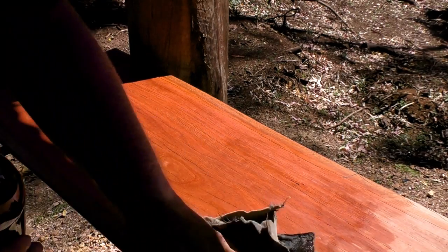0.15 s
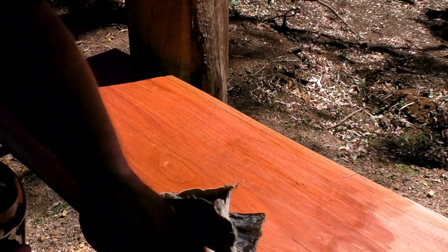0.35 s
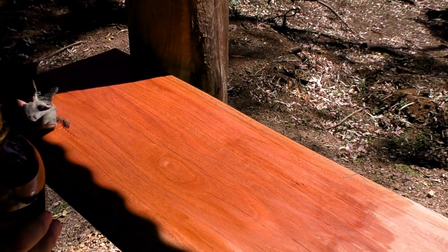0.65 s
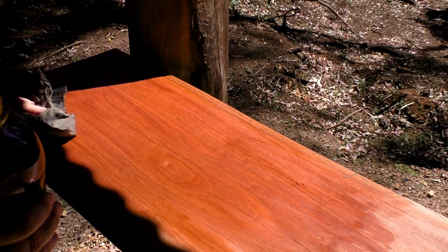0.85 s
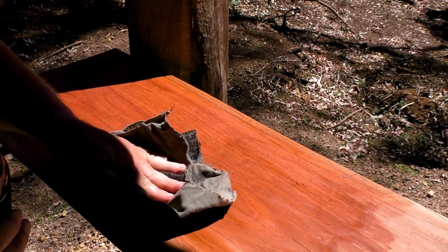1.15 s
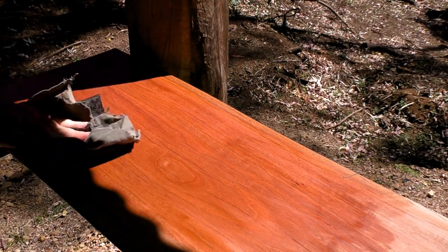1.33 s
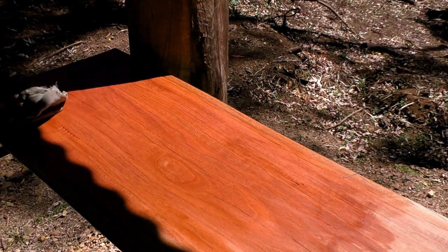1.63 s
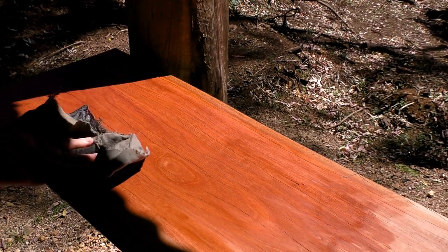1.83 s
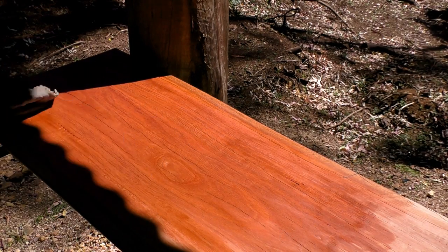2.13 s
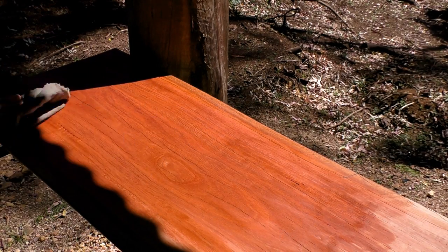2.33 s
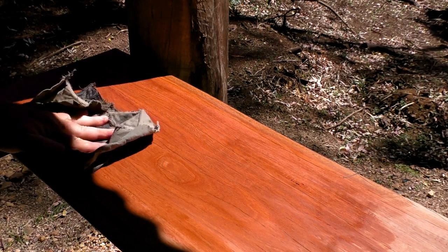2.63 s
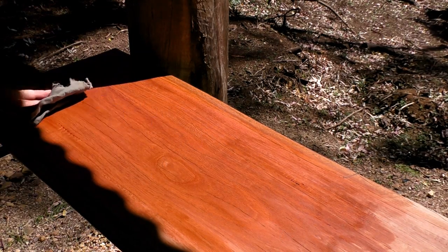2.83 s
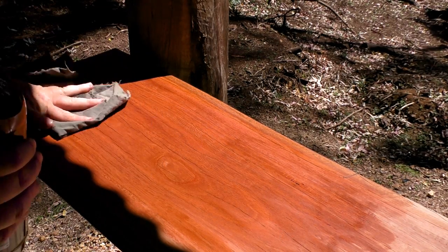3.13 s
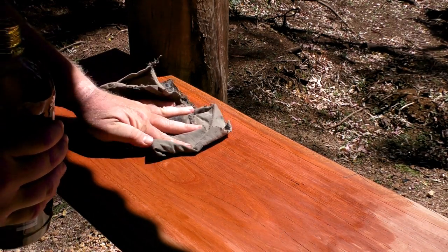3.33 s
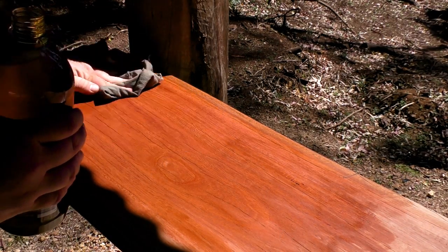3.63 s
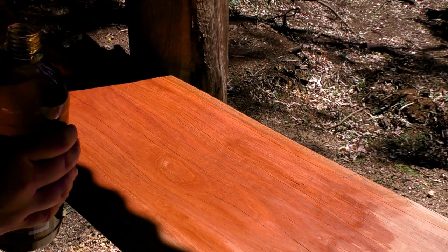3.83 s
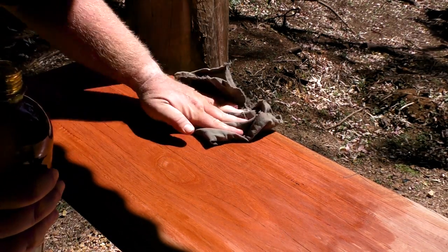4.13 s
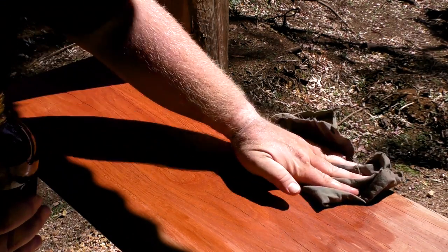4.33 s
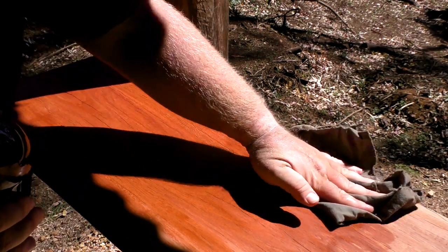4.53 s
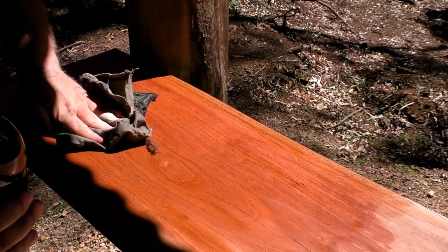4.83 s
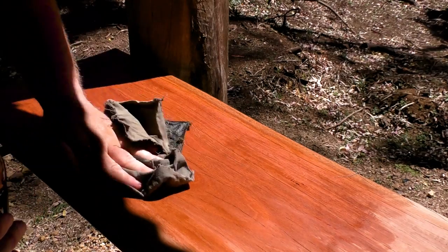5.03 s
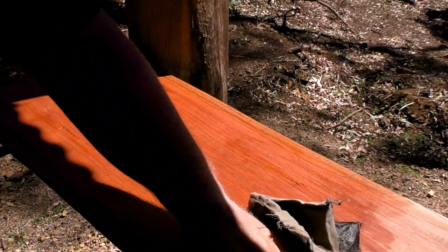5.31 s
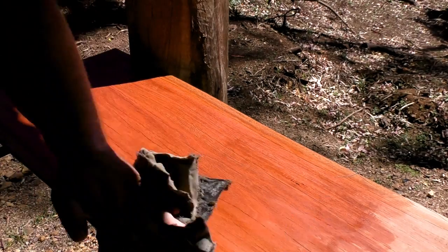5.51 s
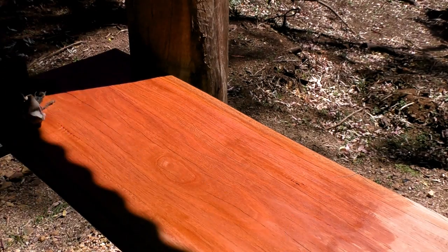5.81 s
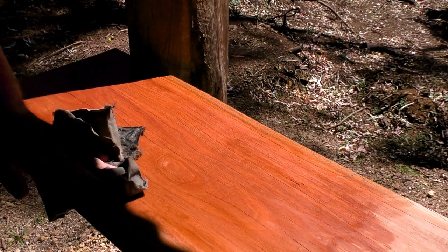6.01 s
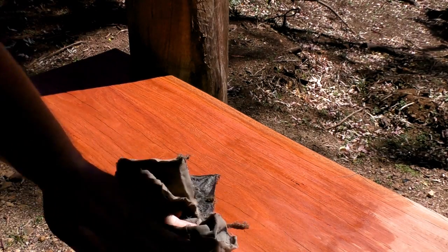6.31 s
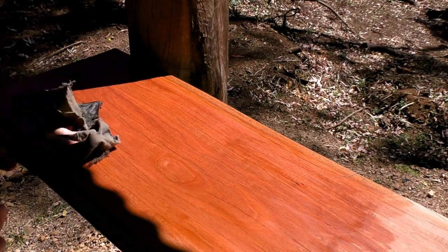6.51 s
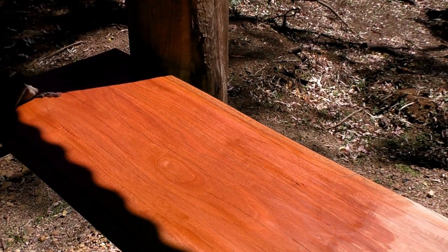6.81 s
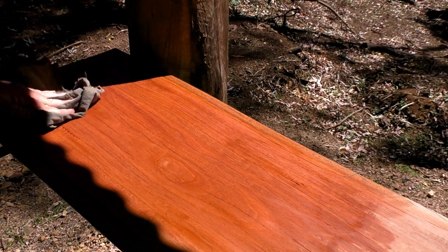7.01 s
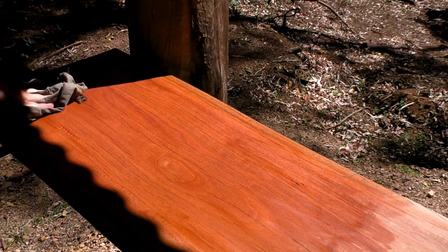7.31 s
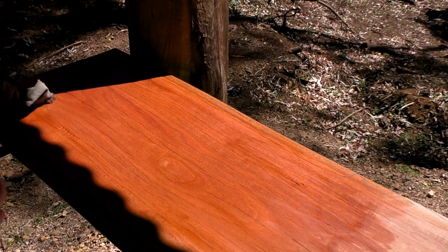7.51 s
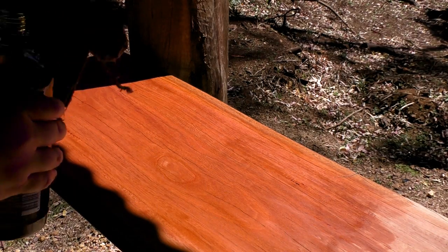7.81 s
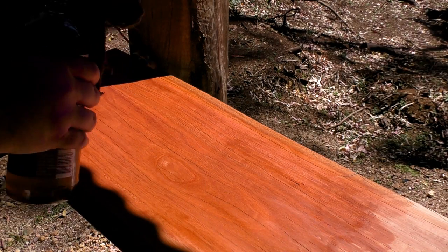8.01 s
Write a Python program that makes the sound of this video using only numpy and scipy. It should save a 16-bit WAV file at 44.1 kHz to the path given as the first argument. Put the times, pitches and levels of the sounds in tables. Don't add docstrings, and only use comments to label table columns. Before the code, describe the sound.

Quick cloth strokes rasp back and forth over bare wood, pausing at each turn, then stop; a bottle ticks at the end.

```python
import sys
import numpy as np
from scipy import signal
from scipy.fft import rfft, irfft
from scipy.io import wavfile
from scipy.ndimage import uniform_filter1d, map_coordinates

SR = 44100
rng = np.random.default_rng(int(sys.argv[2]) if len(sys.argv) > 2 else 0)


def convert_level_to_amplitude(level_db):
    exponent = np.asarray(level_db, float) / 20
    return 10 ** exponent


def pcm_store(signal):
    levels = np.round(np.clip(np.atleast_2d(signal), -1, 1) * 32767)
    wavfile.write(sys.argv[1], SR, levels.astype(np.int16).T)


N = 359856
CLOCK = np.arange(N) / SR

# t/s, level/dB, hollow f/Hz, rise shape, fall shape (small = full, 1 = straight)
STROKES = [(.08, -37, 3380, 0.57, 0.53), (.53, -37, 3500, 1.1, 1.52), (1.14, -40.5, 2660, 0.81, 0.9),
           (1.38, -42, 2700, .7, 1.15), (1.75, -45, 2240, 0.34, 0.69), (2.08, -43.5, 2480, 0.98, 0.81),
           (2.42, -44, 2380, 0.31, 1.3), (2.82, -44, 2350, 1.2, 0.56), (3.27, -39.5, 2380, 0.82, 1.07),
           (3.72, -44, 2300, 0.52, 2.1), (4.26, -42.5, 2380, .6, 0.36), (4.8, -40.5, 2320, 0.44, 0.75),
           (5.22, -41, 2730, 0.84, 0.66), (5.62, -42, 2750, 0.97, 1.1), (6.19, -41.5, 2620, 0.48, 0.54),
           (6.47, -43, 2650, 0.98, 0.69), (7.14, -43.5, 2420, 0.41, .7), (7.36, -43, 2670, 0.88, 0.87),
           (7.598, -41.5, 1830, 1, 0.98)]
# t/s, level/dB around the stop, stop depth/dB, half length/s, reach to near end [0-1]
TURNS = [(0.0, -50.5, -5.3, 0.025, 0.04), (0.32, -47.5, 15.5, 0.017, 0.96), (0.827, -52, 15, 0.013, 0.11),
         (1.24, -51.5, 9, 0.015, 0.42), (1.625, -48.5, 16, 0.019, .05), (1.962, -46, 10.5, .028, 0.42),
         (2.305, -49.5, 15, 0.023, 0), (2.701, -47, 9, .022, 0.23), (3.023, -52, 9.5, 0.041, .05),
         (3.499, -47.5, 8, .022, 0.36), (3.867, -48.5, 15.5, 0.028, 0.19), (4.556, -53, 14, 0.02, 0.76),
         (4.983, -50, 4.5, 0.016, 0), (5.424, -49, 14, 0.016, 0.77), (5.881, -51, 13, 0.015, 0),
         (6.328, -52.5, 11, 0.019, 0.79), (6.907, -55.5, 14, 0.017, 0), (7.24, -52.5, 15, 0.011, 0.33),
         (7.555, -58, -3, 0.023, 0.16), (7.68, -66, 6, .02, 0.2)]
# t/s, far-end left-right level/dB, looseness of hold level/dB
HAND_PATH = [(0, 3, -3), (.2, 4, -5), (.7, 5.5, 0), (1.02, 3, -1), (1.3, 4, -5), (1.52, 4.5, -1),
             (2.15, 4, -1), (2.5, 4, -4.5), (3.22, 3, 1.5), (3.5, 2.5, 1), (4.2, 3, 3), (4.9, 2.8, 0.5),
             (5.3, 4, -2.5), (5.9, 3.5, 4.5), (6.35, 7, -1.5), (6.6, 4.5, -2), (6.8, 3.5, -1.5),
             (7.05, 3.5, 0)]
# t/s, length/s, f/Hz, glide/(Hz per s), lift level/dB
SQUEAKS = [
    (0.087, .04, 3650, 0, 6),
    (.54, .04, 4320, 0, 10),
    (4.73, 0.12, 1550, 7000, 8),
    (7.35, .06, 2700, 1000, 5),
    (5.63, 0.04, 5000, -9000, 3),
    (7.6, .022, 2110, 15000, 7),
]
# middle t/s, half length/s, level/dB
TAILS = [
    (2.1, .3, -56),
    (6.6, .09, -50),
]

# f/Hz, level/dB per Hz
BOARD_DRONE = [(600, -27), (850, -16.5), (1050, -3.5), (1250, -2), (1600, -1), (2200, -18.5), (3000, -65)]
WEAVE_SCRUB = [(900, -16), (1400, -9.5), (2000, -1), (3500, -3), (5000, -4.5), (6500, -13.5), (9000, -67)]
FIBRE_HISS = [(4000, -28), (5500, -1), (7400, -2.5), (9000, 0), (10500, -1), (13000, -13), (15800, -19)]
LOOSE_THREADS = [(8500, -42), (10500, -2), (12000, 3), (13800, -0.5), (15800, -4.5)]
TRAILING_HISS = [(11500, -30), (13200, 1), (15000, .5), (15800, -8)]
# f/Hz, likeness [0-1]
RAG_ALIKE = [(800, 0.72), (1400, 0.87), (3100, 0.94), (5000, 0.9), (6800, 1), (9000, 0.95), (15000, 0.86)]

# t/s, peak level/dB, f/Hz, rise/s
THUMPS = [
    (.30, -45, 62, 0.015),
    (.959, -34.5, 160, 0.0035),
    (2.458, -56, 74.6, 0.021),
    (3.16, -50, 52, 0.022),
    (5.629, -50.5, 75.5, 0.014),
    (7.262, -43, 68.4, 0.015),
    (7.341, -36.5, 65, 0.013),
    (7.355, -35, 120, 0.0078),
    (7.389, -45, 68.4, 0.019),
]
# t/s, level/dB
NUDGES = [
    (1.69, -55.5),
    (2.355, -56),
    (2.55, -72),
    (3.92, -63),
    (5.86, -62),
    (7.01, -58),
    (7.58, -60),
]
# f/Hz, level/dB, t60/s
BOARD_MODES = [(290, -9, 0.11), (399, 6, 0.34), (543, 3, 0.4), (700, -1, 0.28), (1110, -13, 0.063)]
# t/s, peak level/dB
TICKS = [
    (8.075, -44),
    (8.0806, -54),
    (8.13, -54),
]
# f/Hz, level/dB, t60/s
GLASS_MODES = [(1450, 3, 0.01), (2050, 4, 0.0081), (3000, 3, 0.0054), (4200, -3, .004), (5700, -9, .005)]
# t/s, length/s, f/Hz, level/dB, trill depth f/Hz
BIRD_NOTES = [
    (0.77, 0.037, 6000, -63, 300),
    (0.797, 0.033, 5400, -63, 60),
    (3.397, .06, 9200, -64, 300),
    (4.466, 0.055, 5960, -61.5, 354),
    (4.923, 0.048, 5940, -57.5, 300),
    (5.052, .05, 6100, -61, 400),
    (5.448, 0.052, 5670, -56.5, 332),
    (8.086, .009, 7100, -74, 200),
    (8.098, .075, 9050, -74, 300),
]

# t/s, level/dB, half length/s
PUFFS = [(.11, -66, 0.028), (0.314, -52, 0.038), (.5, -67, .04), (.95, -70, .03), (1.248, -59, .03),
         (2.086, -59, .035), (2.2, -63, 0.027), (2.39, -57, .05), (2.48, -45, 0.042), (2.91, -68, 0.022),
         (3.02, -63, 0.032), (3.18, -62, .06), (4.86, -71, 0.023), (5.27, -68, .04), (5.436, -48, 0.047),
         (5.645, -56, .035), (5.75, -55, .025), (6, -47.5, 0.071), (6.14, -52, .035), (6.3, -66, 0.24),
         (6.6, -67, 0.054), (7.285, -48, 0.033), (7.383, -42, 0.042), (7.444, -50.5, 0.05),
         (7.613, -58, 0.047)]
# f/Hz, level/dB per Hz
BUFFET = [(15, -30), (30, -2), (50, -3.5), (64, 2), (85, -2), (130, -9), (170, -6), (240, -41)]
# t/s, level/dB
WOODS = [(0.0, -53.5), (1.0, -53.5), (1.64, -57.5), (1.72, -53), (3.25, -53), (3.7, -57), (4.05, -53.5),
         (5.43, -55), (5.57, -56.5), (6.17, -49.5), (6.34, -58.5), (6.55, -52.5), (7.5, -56.5),
         (7.9, -53.5), (8.16, -65.5)]
# f/Hz, level/dB per Hz
RUMBLE = [(60, -31), (120, -2), (200, -1), (390, 0), (470, -5.5), (550, -11.5), (640, -15.5), (900, -18.5)]
LEAVES = [(400, -30), (640, -10), (800, -7), (1470, 0), (2400, -3), (3800, -13), (7000, -20), (11000, -20),
          (15800, -21)]
# f/Hz, likeness [0-1]
FAR_ALIKE = [(60, 0.28), (130, 0.31), (290, 0.66), (640, 0.74), (1400, 0.51), (3100, 0.59), (6800, 0.4),
             (15000, 0.53)]

RESTING_HZ, USUAL_DB = 2090, -44.5
LIFT_S = 7.65
PAN_PER_REACH_DB = -5.5
LOOSE_HISS_SHARE = 0.54
REACH_BEND = 1.15
LEAVES_DB, BREEZE_DB, BREEZE_SWING_DB = -62, -66.5, 1.5
TOP_HZ = 15780


def unit(x):
    return x / np.sqrt(np.mean(x ** 2) + 1e-20)


def along(points, hz):
    f, v = np.transpose(points)
    return np.interp(np.log(hz + 1), np.log(f + 1), v)


def curves(rows):
    s, *cols = np.transpose(rows)
    return [np.interp(CLOCK, s, c) for c in cols]


def wobble(rate):
    knots = rng.standard_normal(int(N * rate / SR) + 4)
    return map_coordinates(knots, [np.arange(N) * rate / SR])


def noise():
    return rng.standard_normal((2, N))


def rush(source, spectrum, alike, patchy_db, moving=lambda hz, s: 1):
    hz, s, z = signal.stft(source, SR, nperseg=1024, noverlap=896)
    patches = uniform_filter1d(rng.standard_normal(z.shape[1:]), size=6, axis=0)
    patches = uniform_filter1d(patches, size=24, axis=1)
    colour = convert_level_to_amplitude(along(spectrum, hz)[:, None] + patchy_db * unit(patches))
    turn = np.arccos(np.clip(along(alike, hz), -1, 1))[:, None] / 2
    z = z * colour * moving(hz[:, None], s) * [np.cos(turn), np.sin(turn)]
    mid, side = signal.istft(z, SR, nperseg=1024, noverlap=896)[1][:, :N]
    return unit(np.array([mid + side, mid - side]))


def motion():
    top_s, top_db, top_hz, rise, fall = np.transpose(STROKES)
    turn_s, turn_db, depth_db, half, reach = np.transpose(TURNS)
    stroke = np.clip(np.searchsorted(turn_s, CLOCK, "right") - 1, 0, len(top_s) - 1)
    rising = CLOCK < top_s[stroke]
    edge = np.where(rising, stroke, stroke + 1)
    from_turn = CLOCK - turn_s[edge]
    way = np.clip(from_turn / (top_s[stroke] - turn_s[edge]), 0, 1)
    pace = way ** np.clip(np.where(rising, rise[stroke], fall[stroke]), .1, None)
    swell_db = turn_db[edge] + (top_db[stroke] - turn_db[edge]) * pace
    swell_db = uniform_filter1d(swell_db, size=SR // 30)
    stop_db = -depth_db[edge] * np.exp(-(np.abs(from_turn) / half[edge]) ** 0.98)
    hollow_hz = RESTING_HZ + (top_hz[stroke] - RESTING_HZ) * way ** 0.4
    return swell_db, stop_db, hollow_hz, np.interp(CLOCK, turn_s, reach)


def rag():
    swell_db, stop_db, hollow_hz, reach = motion()
    across_db, loose_db = curves(HAND_PATH)
    speed = convert_level_to_amplitude(swell_db + stop_db)
    pan_db = across_db + PAN_PER_REACH_DB * reach
    bent_reach = np.abs(reach) ** REACH_BEND
    clumps = convert_level_to_amplitude(0.45 * wobble(250) + .6 * wobble(25))

    def over_scrub(db, per_swell_db, stop_share, per_reach, per_octave):
        level = db + per_swell_db * (swell_db - USUAL_DB) + stop_share * stop_db
        return level + per_reach * bent_reach + per_octave * np.log2(hollow_hz / RESTING_HZ)

    def slips():
        catches = (rng.random(N) < .03) * rng.laplace(0, 1.2, N)
        return clumps * (noise() + catches)

    def hollow(hz, s):
        centre = np.interp(s, CLOCK, hollow_hz)
        lift = 1 + 1.24 * np.exp(-(np.log2((hz + 1) / centre) / 0.94) ** 2)
        for at, length, start_hz, glide, db in SQUEAKS:
            fold_hz = np.clip(start_hz + glide * (s - at), 500, None)
            off_pitch = np.log2((hz + 1) / fold_hz) / 0.14
            lift = lift * convert_level_to_amplitude(db * np.exp(-((s - at) / length) ** 2 - off_pitch ** 2))
        shape = convert_level_to_amplitude(along(WEAVE_SCRUB, hz))
        return lift / np.sqrt(np.sum((lift * shape) ** 2, axis=0))

    def lean(db):
        return convert_level_to_amplitude([[db], [-db]])

    drone_db = over_scrub(-7, per_swell_db=-0.35, stop_share=-0.2, per_reach=9.5, per_octave=-13.5)
    hiss_db = over_scrub(-3, per_swell_db=-0.18, stop_share=0.5, per_reach=-4.5, per_octave=3.5)
    fine_db = over_scrub(-2, per_swell_db=-0.38, stop_share=1, per_reach=-13.5, per_octave=4)
    hiss_db = hiss_db + LOOSE_HISS_SHARE * loose_db
    fine_db = fine_db + loose_db

    rub = rush(slips(), WEAVE_SCRUB, RAG_ALIKE, patchy_db=1.0, moving=hollow)
    rub = rub + convert_level_to_amplitude(drone_db) * rush(slips(), BOARD_DRONE, RAG_ALIKE, patchy_db=2.26)
    rub = rub + convert_level_to_amplitude(hiss_db) * rush(slips(), FIBRE_HISS, RAG_ALIKE, patchy_db=0.3) * lean(db=-0.6)
    rub = rub + convert_level_to_amplitude(fine_db) * rush(slips(), LOOSE_THREADS, RAG_ALIKE, patchy_db=1.1) * lean(db=.8)

    contact = np.clip((LIFT_S - CLOCK) / .045 + .4, 0, 1)
    trail = sum(convert_level_to_amplitude(db) * np.exp(-((CLOCK - s) / half) ** 4) for s, half, db in TAILS)
    trail = trail * rush(noise(), TRAILING_HISS, RAG_ALIKE, patchy_db=1.2)
    return (rub * speed * contact + trail) * convert_level_to_amplitude(np.array([pan_db, -pan_db]) / 2)


def wind_thumps():
    out, t = np.zeros(N + SR), np.arange(SR // 4) / SR
    for s, db, hz, rise in THUMPS:
        push = np.e * (t / rise) * np.exp(-t / rise)
        out[round(s * SR):][:len(t)] -= convert_level_to_amplitude(db) * push * np.sin(2 * np.pi * hz * t)
    return out[:N]


def board_hum():
    out, t = np.zeros(N + SR), np.arange(SR // 3) / SR
    for s, db in NUDGES:
        ring = 0
        for hz, level, t60 in BOARD_MODES:
            decay = convert_level_to_amplitude(level + rng.normal(0, 0.84) - 60 * t / t60)
            ring = ring + decay * np.sin(2 * np.pi * (hz * t + rng.random()))
        out[round(s * SR):][:len(t)] += convert_level_to_amplitude(db) * ring * (1 - np.exp(-t / 0.012))
    return out[:N]


def bottle():
    out, t = np.zeros(N + SR), np.arange(SR // 4) / SR
    ring = sum(convert_level_to_amplitude(level - 60 * t / t60) * np.sin(2 * np.pi * hz * t) for hz, level, t60 in GLASS_MODES)
    for s, db in TICKS:
        out[round(s * SR):][:len(t)] += convert_level_to_amplitude(db + 4.0) * ring * (1 - np.exp(-t / 0.00059))
    return out[:N]


def shelter(x):
    echoes = np.zeros((2, SR // 20))
    echoes[:, 0] = 1
    late = rng.integers(100, SR // 20, (2, 8))
    bounce = convert_level_to_amplitude(-11 - 400 * late / SR) * rng.choice([-1, 1], (2, 8))
    np.put_along_axis(echoes, late, bounce, axis=1)
    return signal.fftconvolve(x[None], echoes, axes=1)[:, :N]


def birds():
    out = np.zeros(N + SR)
    for s, length, hz, db, trill_hz in BIRD_NOTES:
        t = np.arange(int(length * SR)) / SR
        beat = 2 * np.pi * 190 * t + np.cumsum(rng.normal(0, 0.117, len(t)))
        pitch = hz + trill_hz * np.sin(beat)
        throb = 1 + .5 * np.tanh(trill_hz / 200) * np.cos(beat)
        swell = np.sin(np.pi * t / length) ** 0.73 * throb
        out[round(s * SR):][:len(t)] += convert_level_to_amplitude(db + 12.0) * swell * np.sin(2 * np.pi * np.cumsum(pitch) / SR)
    return out[:N]


def wind_puffs():
    swirl = rush(noise(), BUFFET, [(40, 0.37), (70, 0.36), (200, 0.19)], patchy_db=5.5)
    power = uniform_filter1d(np.mean(swirl ** 2, axis=0), size=SR // 20)
    swirl = swirl / np.sqrt(np.abs(power) + 0.085)
    gusts = sum(convert_level_to_amplitude(db) * np.exp(-((CLOCK - s) / half) ** 2) for s, db, half in PUFFS)
    breeze = convert_level_to_amplitude(BREEZE_DB + BREEZE_SWING_DB * wobble(14))
    return (breeze + gusts) * swirl


def trees():
    leaves = convert_level_to_amplitude(LEAVES_DB) * rush(noise(), LEAVES, FAR_ALIKE, patchy_db=2.0)
    rumble = convert_level_to_amplitude(curves(WOODS)[0]) * rush(noise(), RUMBLE, FAR_ALIKE, patchy_db=1.44)
    return leaves + rumble


def scene():
    knocks = shelter(wind_thumps() + board_hum() + bottle())
    knocks = knocks * convert_level_to_amplitude([[1.0], [-1.0]])
    return rag() + knocks + shelter(birds()) + wind_puffs() + trees()


def roll_off(x):
    return signal.sosfilt(signal.butter(12, 16490, fs=SR, output="sos"), x)


def record(dry):
    kept = irfft(rfft(dry) * (np.fft.rfftfreq(N, 1 / SR) < TOP_HZ), N)
    return roll_off(kept)


dry = scene()
out = record(dry)
pcm_store(out)
```